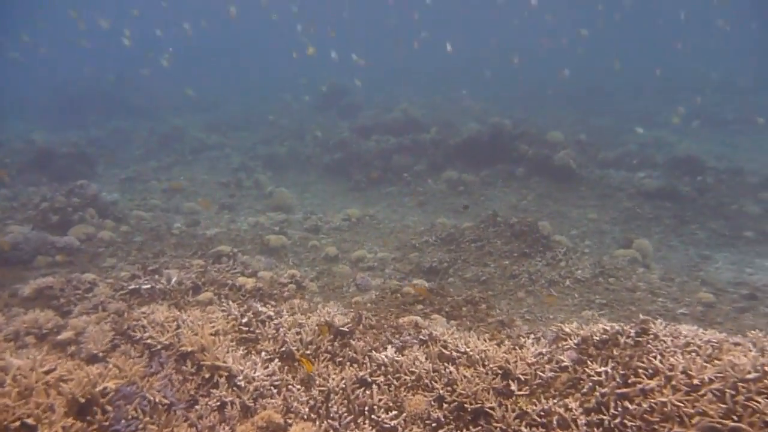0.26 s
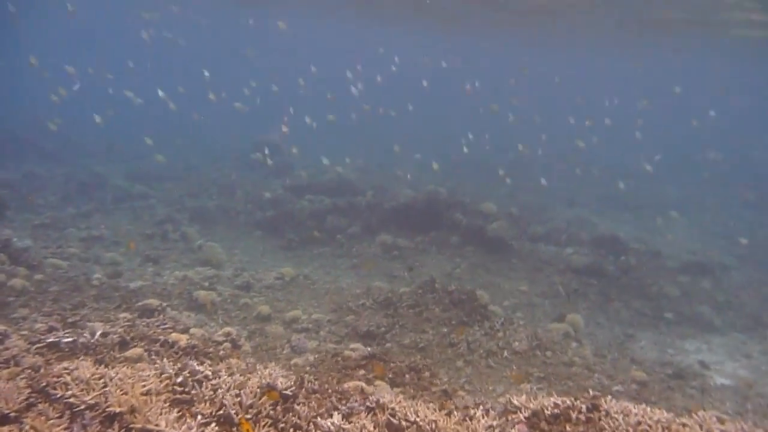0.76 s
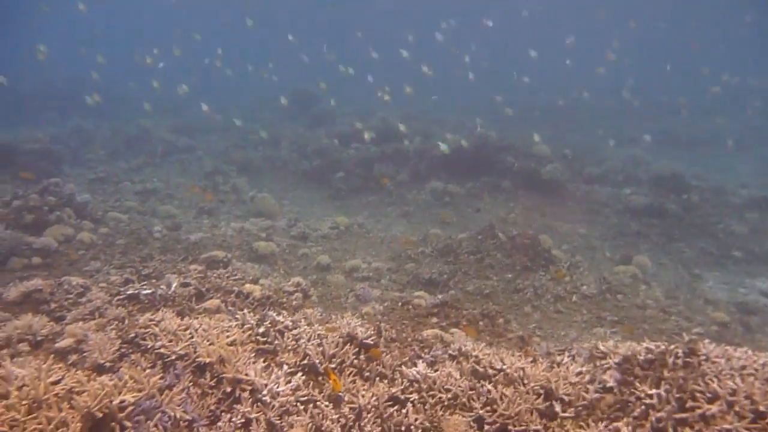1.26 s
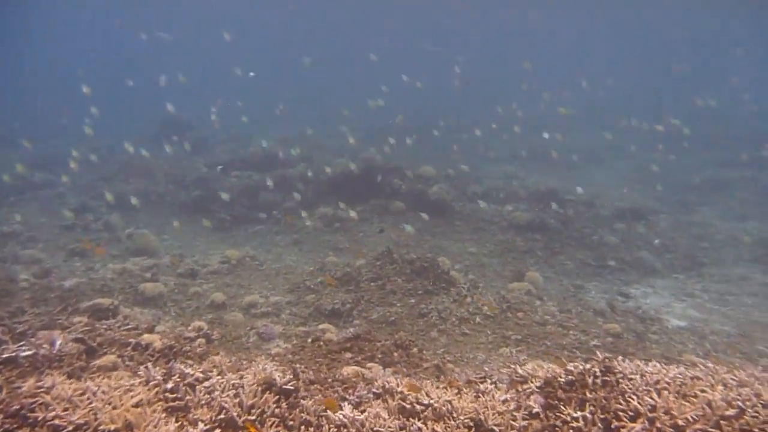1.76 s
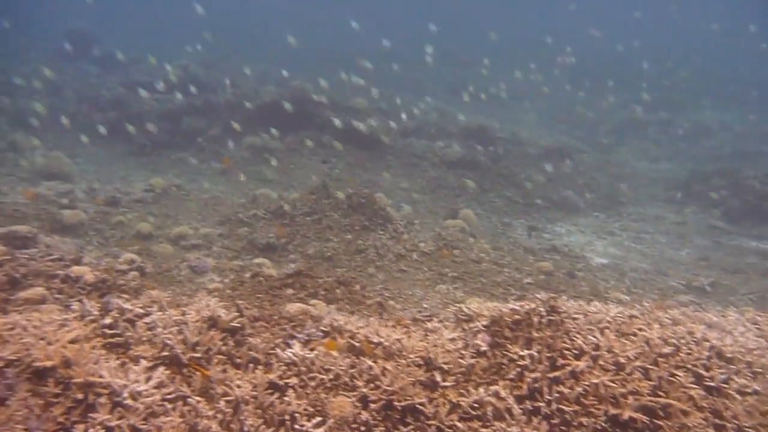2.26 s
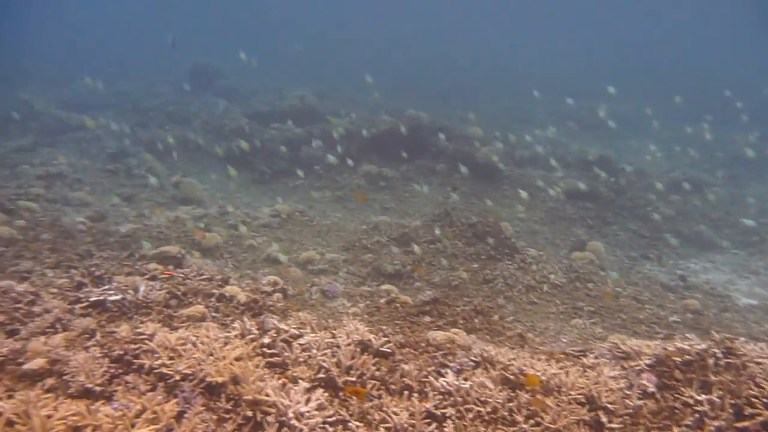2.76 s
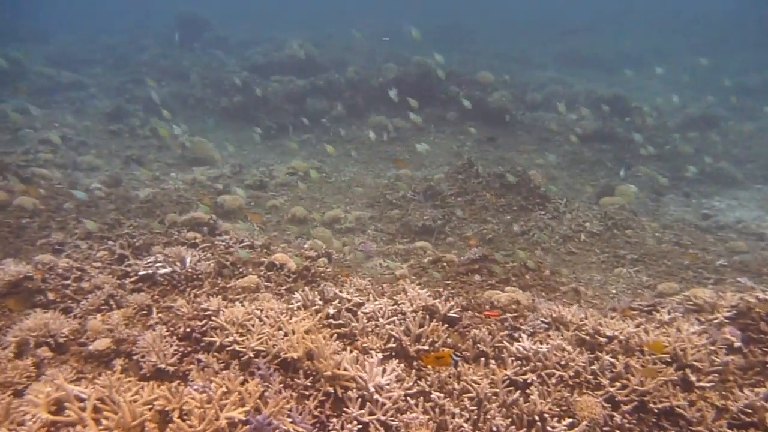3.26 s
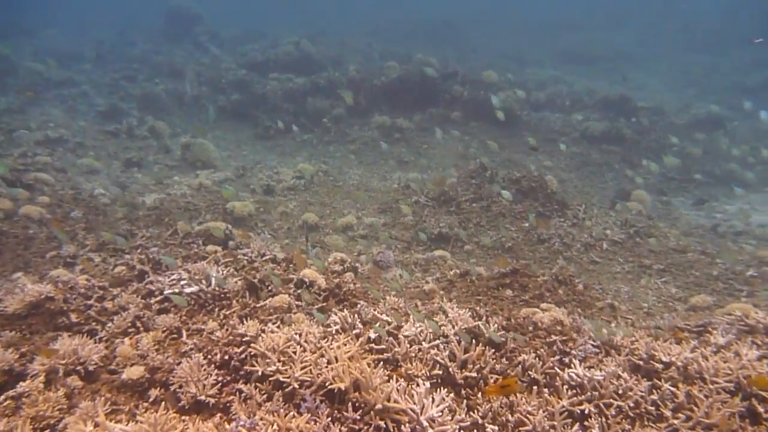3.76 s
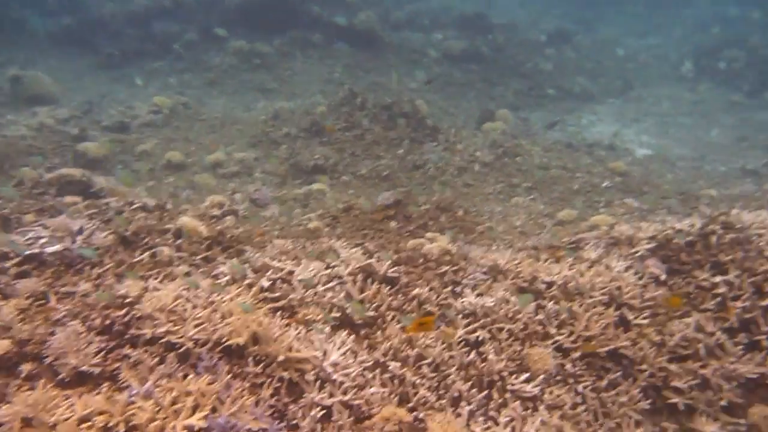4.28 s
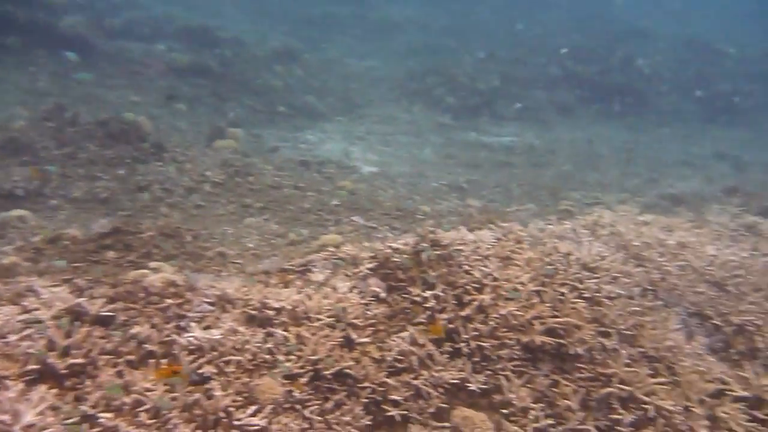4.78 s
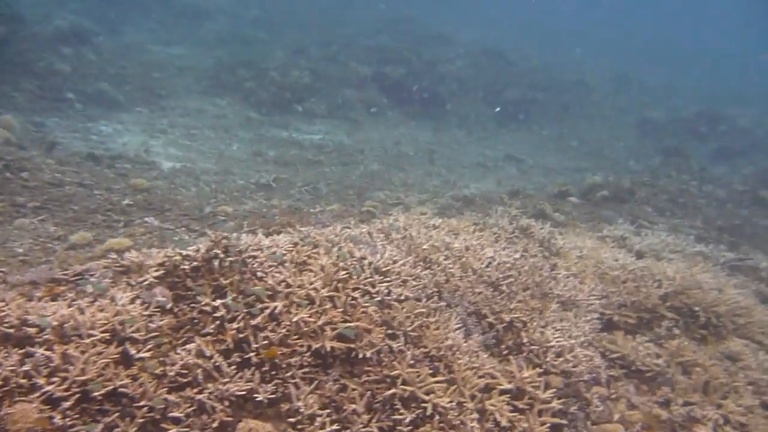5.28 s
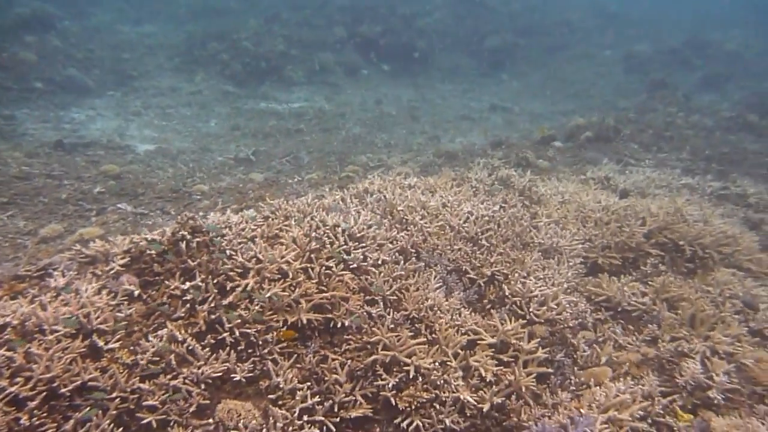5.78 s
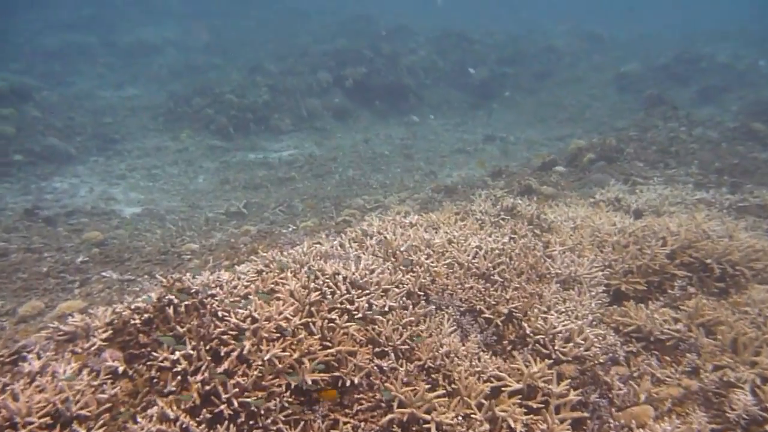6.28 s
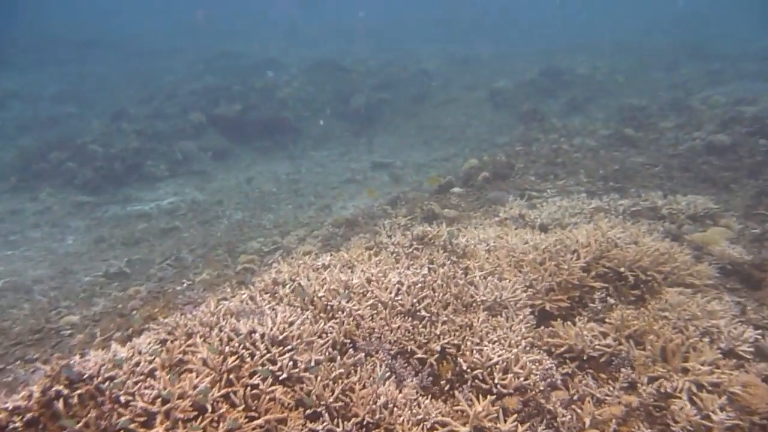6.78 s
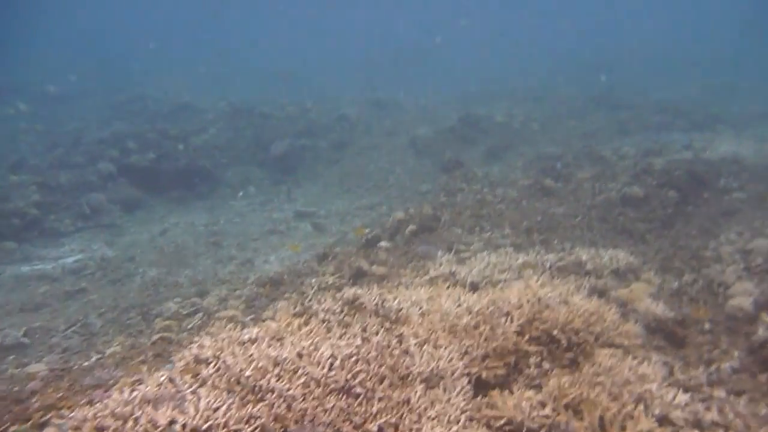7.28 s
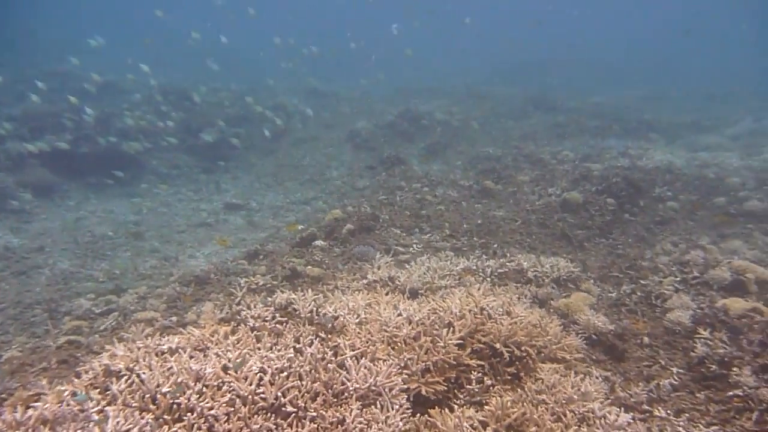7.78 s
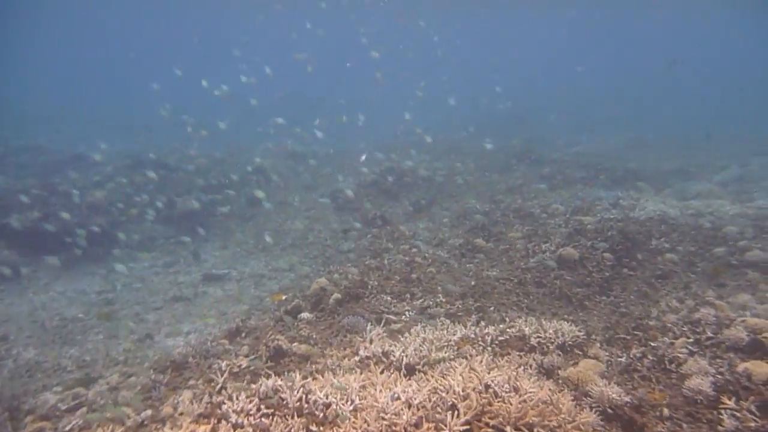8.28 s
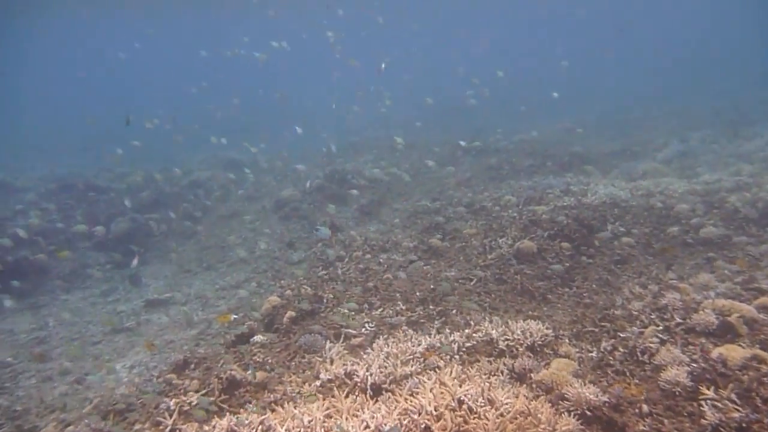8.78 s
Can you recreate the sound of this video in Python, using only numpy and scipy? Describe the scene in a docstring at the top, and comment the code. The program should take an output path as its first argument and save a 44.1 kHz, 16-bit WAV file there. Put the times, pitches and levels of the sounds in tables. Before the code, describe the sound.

Snapping shrimp crackle nonstop like frying fat, near clicks popping out sharply above a fizzing bed, with faint water wash and occasional bubbly blips.

```python
"""Snapping shrimp crackle under water above a shallow coral reef, heard inside a stiff housing.
Each snap is a very short burst of noise, shaped by the housing. Near snaps crack singly, and the
steepest overload the microphone; farther ones merge into a fizz, with filtered noise as the finest hiss.
Air pockets gurgle as short ringing tones. Water swishes and washes past as coloured noise, over a faint rumble."""
import sys
import numpy as np
from scipy import signal
from scipy.fft import rfft, irfft, next_fast_len
from scipy.io import wavfile
from scipy.ndimage import uniform_filter1d, map_coordinates

SR = 44100
rng = np.random.default_rng(int(sys.argv[2]) if len(sys.argv) > 2 else 0)


def wav_record(signal):
    """Record a signal, one row per channel, as 16-bit PCM in the file named by sys.argv[1]."""
    frames = np.transpose(np.atleast_2d(signal))
    bounded = np.clip(frames, -1, 1)
    # unit amplitude maps onto the largest positive 16-bit level
    quanta = np.round(bounded * 32767).astype(np.int16)
    wavfile.write(sys.argv[1], SR, quanta)


N = 398663


def amp(db):
    """Turn decibels into gain."""
    return 10 ** (np.asarray(db) / 20)


def unit(x):
    """Scale to an rms of 1."""
    return x / np.sqrt(np.mean(x ** 2) + 1e-20)


def along(points, hz):
    """Read a curve of (frequency, value) points on a log frequency axis."""
    f, v = np.transpose(points)
    return np.interp(np.log(hz + 1), np.log(f + 1), v)


def wobble(rate):
    """A smooth random curve with this many random knots a second."""
    knots = rng.standard_normal(int(N * rate / SR) + 4)
    return map_coordinates(knots, [np.arange(N) * rate / SR])


def filtered(x, response):
    """Filter x by a response given as a function of frequency."""
    m = next_fast_len(N + SR // 2)
    return irfft(rfft(x, m) * response(np.fft.rfftfreq(m, 1 / SR)), m)[:N]


def causal(gain):
    """The minimum-phase response with this gain: it rings after a sound, never before it."""
    cepstrum = irfft(np.log(gain))
    half = len(cepstrum) // 2
    cepstrum[1:half] *= 2
    cepstrum[half + 1:] = 0
    return np.exp(rfft(cepstrum))


def rush(spectrum, patchy_db):
    """Coloured noise of rms 1, made uneven by random patches in time and frequency."""
    z = signal.stft(rng.standard_normal(N), nperseg=1024)[2]
    field = uniform_filter1d(rng.standard_normal(z.shape), size=4, axis=0)
    field = uniform_filter1d(field, size=4, axis=1)
    noise = signal.istft(z * amp(patchy_db * unit(field)))[1][:N]
    return unit(filtered(noise, lambda hz: amp(along(spectrum, hz))))


def placed(times, waves):
    """Add up short waves, one per row, each starting at its own time."""
    starts = np.round(np.maximum(times, 0) * SR).astype(int)
    index = starts[:, None] + np.arange(waves.shape[1])
    return np.bincount(index.ravel(), waves.ravel(), N)[:N]


# the loudest snaps of the nearest shrimp, with levels before the bass block and the notches:
# start_s, knock_db, crack_db, fizz_db
NEAR_SNAPS = [(0.1024, -29, -17.5, -12), (0.3026, -22.5, -15.5, -14), (0.3656, -41, -19.5, -34),
              (0.563, -23.5, -14.5, -17), (0.6643, -29, -13.5, -10), (0.7496, -27.5, -19, -27),
              (0.785, -29, -16, -14), (0.98, -29.5, -18, -14.5), (1.0247, -31, -18, -13),
              (1.0373, -16, -12.5, -14), (1.2584, -33, -22.5, -27), (1.6596, -18.5, -11, -7.5),
              (1.8613, -31, -15.5, -8), (2.014, -29, -17.5, -23), (2.101, -26.5, -20, -17.5),
              (2.2783, -12, -10.5, -8), (2.5208, -26, -15, -10), (2.743, -38, -18.5, -21.5),
              (3.1657, -22.5, -11.5, -7), (3.3525, -2, -8, -8), (3.5895, -35, -21, -17.5),
              (3.6871, -21, -16.5, -12.5), (3.7145, -25, -13.5, -15.5), (3.8195, -39, -25.5, -20),
              (3.9882, -12, -12.5, -16.5), (4.1195, -23, -17, -23), (4.2823, -42, -22, -17.5),
              (4.3991, -28, -14, -14.5), (4.4982, -24.5, -16.5, -18), (4.5555, -27.5, -19.5, -29),
              (4.5854, -27, -22, -19), (4.7274, -32.5, -20, -16), (4.984, -31.5, -17, -24.5),
              (5.0414, -24, -16.5, -15), (5.1566, -24.5, -15, -13), (5.195, -25.5, -13, -14.5),
              (5.243, -29.5, -17, -32), (5.291, -34, -16.5, -22), (5.5712, -22.5, -17, -27),
              (5.659, -14.5, -13.5, -7.5), (5.931, -26, -20, -18.5), (5.9597, -25.5, -13, -23),
              (6.0583, -34.5, -21.5, -24), (6.0683, -42, -18, -16.5), (6.154, -30, -19.5, -24),
              (6.2242, -17, -9, -2), (6.4958, -25.5, -19.5, -38), (6.6829, -25, -17, -25),
              (6.9616, -34, -25, -14.5), (6.992, -22, -14, -14.5), (7.1452, -35, -19.5, -26),
              (7.2781, -33, -18, -20), (7.4591, -24, -15.5, -11.5), (7.485, -28, -16.5, -12),
              (7.774, -20.5, -12.5, -28), (7.7884, -25, -17, -11), (8.4047, -22, -15.5, -13),
              (8.7464, -21.5, -14.5, -26), (8.9828, -25.5, -18, -14.5), (9.0244, -21, -15.5, -45)]


def near_shrimp():
    """Loud single cracks from the coral just below, each with its own knock, crack and fizz."""
    rows = np.array(NEAR_SNAPS)
    return snaps(rows[:, 0], rows[:, 1:], spread=.00033, scatter_db=-23.5, scatter_t60=0.029,
                 ripple_db=3, heft=1.2, body_hz=1460)


# the knock, crack and fizz ranges of a snap: low_hz, high_hz
SNAP_RANGES = [(0, 3300), (3300, 7000), (7000, 23000)]
# how the housing colours a snap, before each range is set to its level: frequency_hz, gain_db
HOUSING_COLOUR = [(100, -98), (500, -37), (1150, -33.5), (1800, -13), (2600, -6), (3300, -7), (4100, 9.5),
                  (5000, 4), (5700, 9), (7000, 3), (8400, 5), (10300, 1.5), (12300, -13), (15700, -20)]


def snaps(times, levels_db, spread, scatter_db, scatter_t60, ripple_db, heft,
          body_hz=1350, body_width_hz=850, size=768, count=13):
    """Collapsing claw bubbles: a tight cluster of noise and a faint scatter off the coral, through the housing."""
    t, hz = np.arange(size) / SR, np.fft.rfftfreq(size, 1 / SR)
    cluster = np.exp(-(t / spread - 1) ** 2)  # spread in seconds
    scatter = amp(scatter_db - 60 * t / scatter_t60)  # t60: seconds to fall by 60 dB
    bursts = rng.standard_normal((len(times), size)) * (cluster + scatter)
    spectra = rfft(bursts) * causal(amp(along(HOUSING_COLOUR, hz)))
    # each direction meets the housing with its own peaks and gaps
    ripples = np.cos(2 * np.pi * np.outer(np.arange(count // 2, count), hz) / SR)
    mix = rng.standard_normal((len(times), len(ripples)))
    spectra *= amp(ripple_db * unit(mix @ ripples))
    # a big bubble, whose knock rivals its crack, has a lower body
    bigness = np.maximum(levels_db[:, :1] - levels_db[:, 1:2] + 7, 0)
    spectra *= amp(heft * bigness * np.exp(-((hz - body_hz) / body_width_hz) ** 2))
    # every snap has its own strength in each range, as rms over a millisecond
    inside = np.array([(hz >= lo) & (hz < hi) for lo, hi in SNAP_RANGES], float)
    blend = uniform_filter1d(inside, size=17, axis=1)
    for _ in range(2):  # the ranges blend at their edges, so a second pass comes closer
        power = abs(spectra) ** 2 @ inside.T * 2 / size / (SR / 1000)
        spectra *= amp((levels_db - 10 * np.log10(power)) @ blend)
    # a little room in front and faded ends keep the edges from clicking
    lead = size // 16
    waves = np.roll(irfft(spectra), lead, axis=1)
    waves = waves * signal.windows.tukey(size, 2 * lead / size)
    return placed(times - spread - lead / SR, waves)


# base level of the distant crackle, which wanders by a few dB; the bed and the hiss add their own offsets:
# time_s, level_db
BED_LEVEL = [(0.0, -41), (1.16, -39.5), (1.66, -36.5), (2.74, -40), (4.45, -35.5), (5.13, -39),
             (6.62, -36.5), (7.58, -41), (8.48, -37), (9.04, -40)]


def shrimp_bed(top_db=22, falloff_db=19, knock_db=-19, crack_db=-6.5, fizz_db=-4.5,
               claw_db=2.0, aim_db=3, nearer=140, count=2600):
    """Thousands of snaps: the farther off, the more there are and the weaker each one is."""
    times = rng.uniform(0, (N - 1) / SR, count)
    bed_db = np.interp(times, *np.transpose(BED_LEVEL))
    distance_db = top_db - falloff_db * np.log10(1 + np.arange(count) / nearer)
    # big claws sound duller, small ones brighter
    colour = claw_db * rng.standard_normal((count, 1)) * [2, 1, -1]
    # direction favours one range or another
    colour = colour + aim_db * rng.standard_normal((count, len(SNAP_RANGES)))
    # keep the mean power gain over the three ranges at 1
    colour -= 10 * np.log10(np.mean(amp(colour) ** 2, axis=1, keepdims=True))
    levels = (bed_db + distance_db)[:, None] + [knock_db, crack_db, fizz_db] + colour
    return snaps(times, levels, spread=.00018, scatter_db=-20, scatter_t60=.024, ripple_db=3.5, heft=0)


# tone colour of the far snaps, only relative: frequency_hz, level_db (per Hz)
HISS_COLOUR = [(500, -24), (1300, -12.5), (2000, -18.5), (2700, 1.5), (3400, -9), (4150, -3.5), (4950, -15),
               (5700, 4.5), (7000, 0.5), (8400, 4), (10300, 4), (12200, -9), (16000, -14)]


def far_hiss(level_db=-7.5, flicker_db=4.5):
    """The most distant snaps merge into a fine, flickering hiss that follows the bed's level."""
    bed_db = np.interp(np.arange(N) / SR, *np.transpose(BED_LEVEL))
    level = amp(bed_db + level_db + flicker_db * wobble(120))
    return level * rush(HISS_COLOUR, patchy_db=2.5)


def bass_block(x, low_hz=330):
    """The snaps keep little bass: below about 330 Hz they fall away steeply."""
    return filtered(x, lambda f: (1j * f / (low_hz + 1j * f)) ** 2)


# two narrow notches of the recorder, which ring briefly after snaps: centre_hz, width_hz
RECORDER_NOTCHES = [(2930, 200), (7830, 110)]


def notches(x):
    """The recorder takes out two narrow bands, and these filters ring briefly after snaps."""
    def response(f):
        bands = [(hz ** 2 - f ** 2) / (hz ** 2 - f ** 2 + 1j * f * width) for hz, width in RECORDER_NOTCHES]
        return np.prod(bands, axis=0)
    return filtered(x, response)


# the larger air pockets; t60_s is the time to fall by 60 dB, and the pitch is a base that then wavers:
# start_s, level_db, pitch_hz, t60_s
LARGE_POCKETS = [(1.8, -20.5, 820, 0.015), (2.032, -21, 754, 0.061), (2.036, -30, 308, 0.15),
                 (2.061, -30, 388, 0.17), (2.293, -27, 627, 0.067), (2.532, -30.5, 506, 0.034),
                 (3.584, -36.5, 634, 0.067), (4.249, -42, 390, 0.12), (4.362, -30.5, 1810, 0.08),
                 (4.374, -41, 585, 0.095), (4.378, -37, 2070, 0.041), (4.924, -43, 415, 0.11),
                 (5.032, -30.5, 920, 0.022), (5.286, -40, 785, 0.073), (6.384, -26.5, 362, 0.062),
                 (7.324, -32.5, 448, 0.13), (7.847, -31.5, 980, 0.021), (8.949, -27.5, 776, 0.026)]


def gurgles(rise=0.02, waver=0.068, attack_s=0.0013):
    """Air pockets ring as they break loose, their pitch wavering and rising a little."""
    s, db, hz, t60 = np.vstack([LARGE_POCKETS, small_pockets()]).T[:, :, None]
    t = np.arange(SR // 5) / SR
    unrest = wobble(200)[:len(s) * len(t)].reshape(len(s), -1)
    pitch = hz * (1 + rise * t / t60 + waver * unrest)
    swell = (1 - np.exp(-t / attack_s)) * amp(db - 60 * t / t60)
    return placed(s[:, 0], swell * np.sin(2 * np.pi * np.cumsum(pitch, axis=1) / SR))


def small_pockets(level_db=-43, spread_db=7.5, low_hz=500, high_hz=950, cycles=38, count=12):
    """Faint pockets at random moments, each falling 60 dB in the same number of base-pitch cycles."""
    moment, strength, size = rng.uniform(0, 1, (count, 3)).T
    hz = high_hz * (low_hz / high_hz) ** size
    db = level_db + spread_db * (2 * strength - 1)
    return np.transpose([moment * N / SR, db, hz, cycles / hz])


# tone colour of the swish, only relative: frequency_hz, level_db (per Hz)
SWISH_COLOUR = [(25, -65), (90, -34), (150, -16), (220, -7.5), (340, 1), (520, -4.5), (750, -6.5),
                (1100, -21.5), (2000, -28.5)]
# surges of water past the housing, with levels before the swish's own offset and churn:
# start_s, length_s, level_db
WATER_SURGES = [(0.85, 0.54, -65.5), (2.019, 0.044, -37), (2.073, 0.12, -47), (2.777, 0.28, -54),
                (6.152, 0.15, -47), (6.347, 0.24, -46), (7.31, 0.12, -53), (7.563, 1, -53.5),
                (7.92, 0.19, -48.5), (8.542, 0.41, -46.5)]


def swish(drift_db=-67, level_db=-0.5, churn_db=2.0):
    """Lumpy noise that swells when the flow past the housing quickens, over a faint steady drift."""
    # the eddies of the drift and of every surge add in power
    power = amp(drift_db) ** 2
    for start, length, db in WATER_SURGES:
        power = power + (amp(db) * surge(start, length)) ** 2
    churn = amp(level_db + churn_db * wobble(35))
    return np.sqrt(power) * churn * rush(SWISH_COLOUR, patchy_db=0.5)


def surge(start, length, attack_share=0.094, release_share=0.43):
    """One surge builds up, holds, then dies away; both time constants are shares of its length."""
    t = np.maximum(np.arange(N) / SR - start, 0)
    build_up = 1 - np.exp(-t / (attack_share * length))
    return build_up * np.exp(-np.maximum(t - length, 0) / (release_share * length))


# tone colour of the slow wash, only relative: frequency_hz, level_db (per Hz)
WASH_COLOUR = [(100, -52), (200, -21), (370, -3), (600, 4), (1000, 1.5), (1500, -0.5), (2500, -9.5)]


def wash(level_db=-53.5):
    """Water washes past without a break: coloured noise whose level wanders slowly."""
    return amp(level_db + wobble(6)) * rush(WASH_COLOUR, patchy_db=2.5)


# tone colour of the open water's deep rumble, only relative: frequency_hz, level_db (per Hz)
RUMBLE_COLOUR = [(20, 0), (150, 0), (600, -20), (3000, -60)]


def rumble(level_db=-85):
    """The open water rumbles very faintly: noise that is mostly bass."""
    return amp(level_db) * rush(RUMBLE_COLOUR, patchy_db=1.5)


def scene():
    """One microphone in the housing feeds both channels."""
    shrimp = near_shrimp() + shrimp_bed() + far_hiss()
    mono = notches(bass_block(shrimp)) + gurgles() + swish() + wash() + rumble()
    return np.array([mono, mono])


def record(dry, steepest=0.59, thump_db=-12, thump_hz=500, ceiling=0.66, top_hz=15900):
    """The microphone overloads: steep snaps add a one-sided thump, peaks round off, the top is cut."""
    x = dry[0]
    # steepness is the change in level from one sample to the next
    excess = np.tanh(np.maximum(abs(np.gradient(x)) - steepest, 0))
    thump = amp(thump_db) * filtered(excess, lambda hz: 1 / (1 + 1j * hz / thump_hz))
    # the peaks round off; the microphone passes little of the bass in that distortion
    rounding = x / (1 + (x / ceiling) ** 6) ** (1 / 6) - x
    rounding = filtered(rounding, lambda hz: (1j * hz / (thump_hz + 1j * hz)) ** 2)
    out = filtered(x + rounding + thump, lambda hz: 1 / np.sqrt(1 + (hz / top_hz) ** 120))
    return np.array([out, out])


dry = scene()
out = record(dry)
wav_record(out)
```